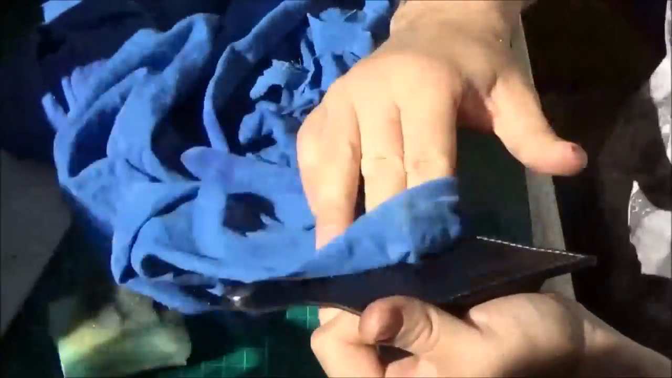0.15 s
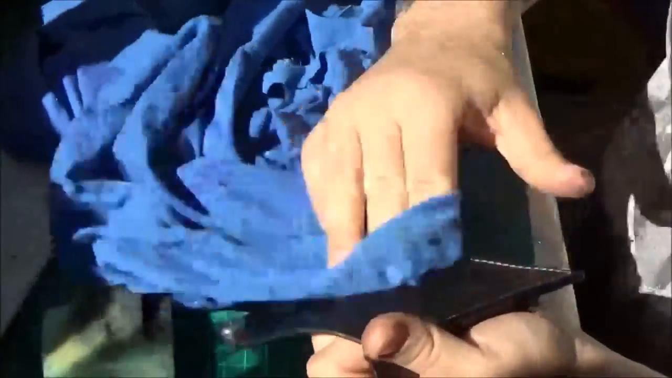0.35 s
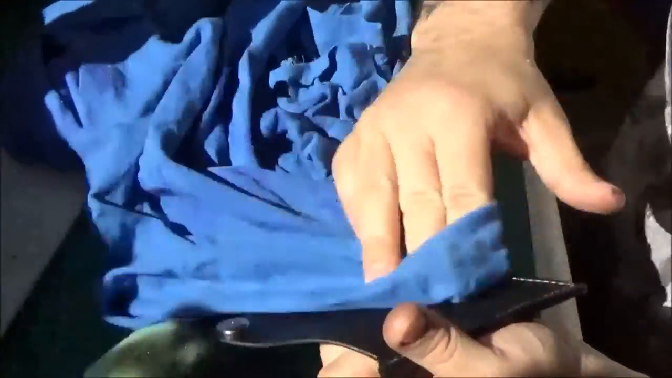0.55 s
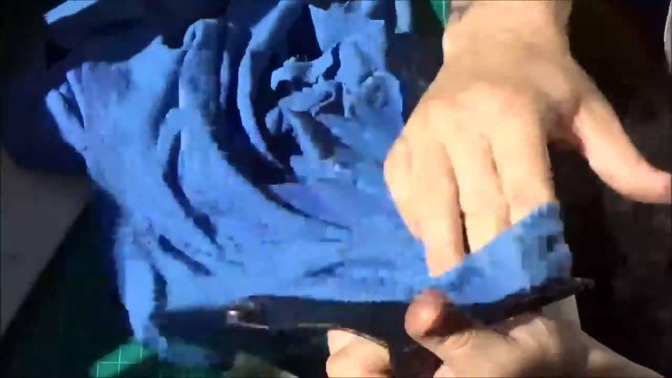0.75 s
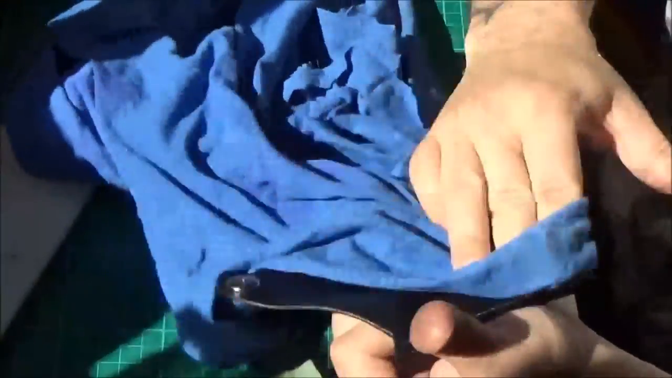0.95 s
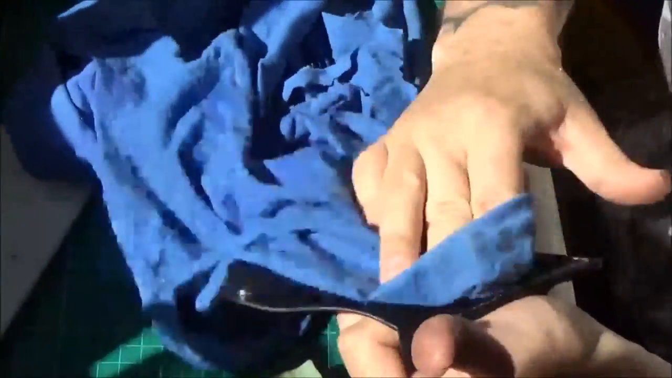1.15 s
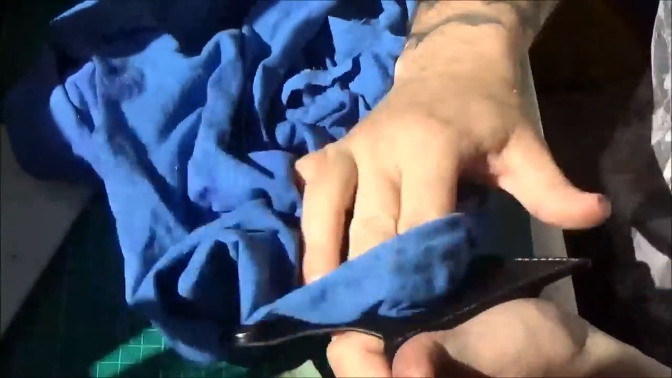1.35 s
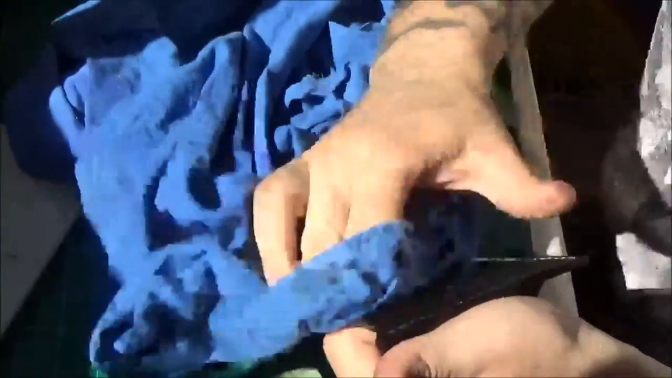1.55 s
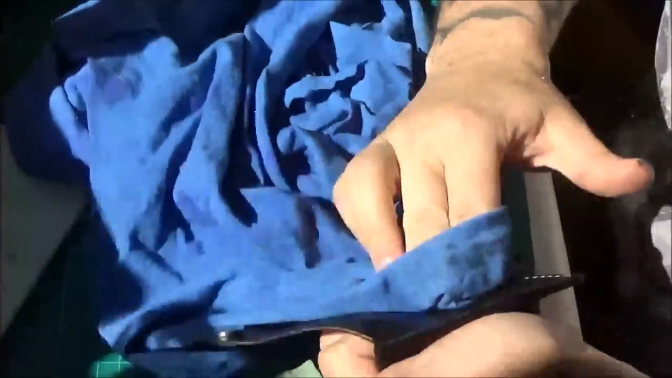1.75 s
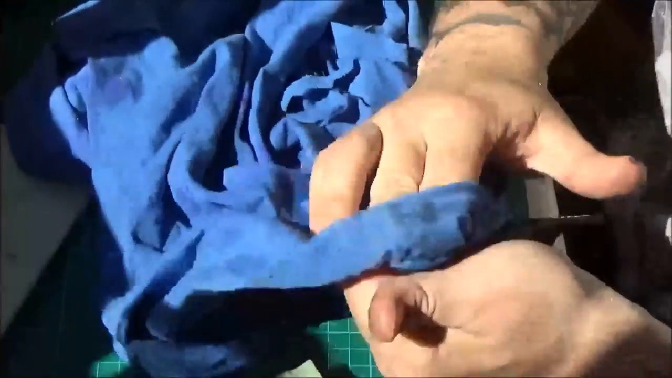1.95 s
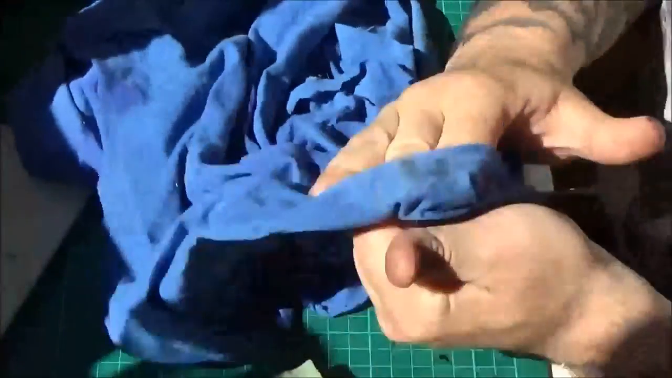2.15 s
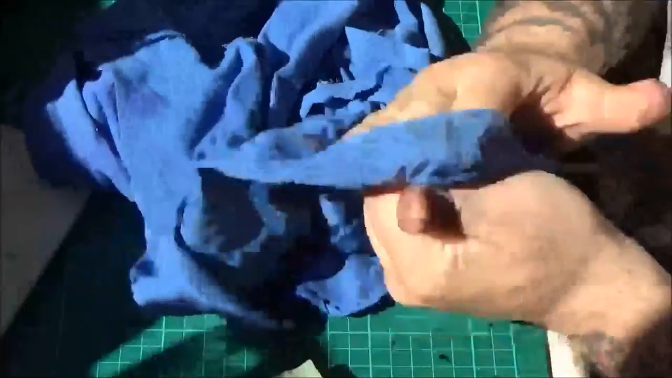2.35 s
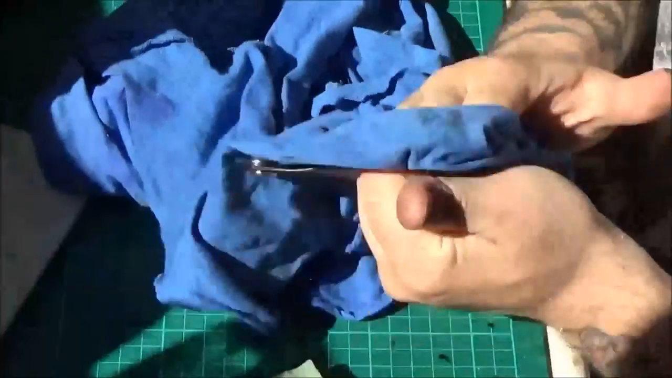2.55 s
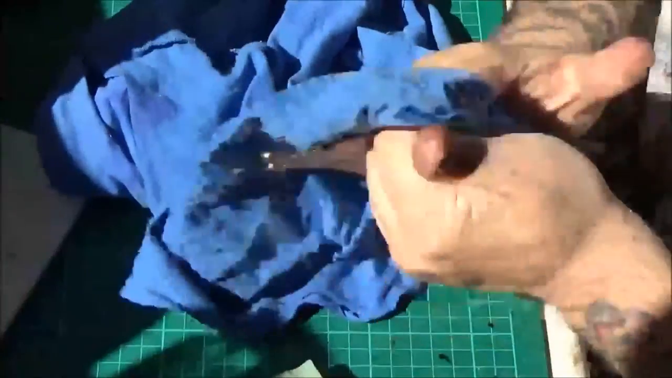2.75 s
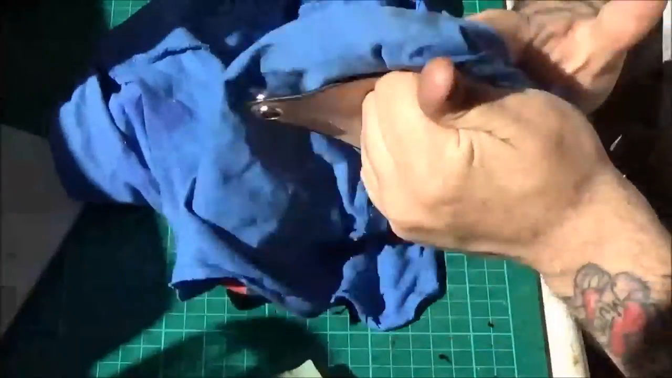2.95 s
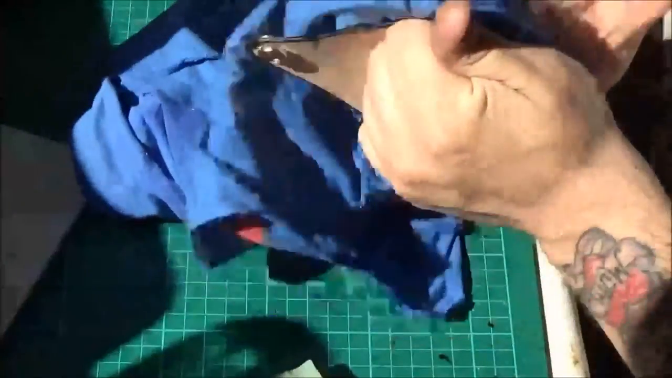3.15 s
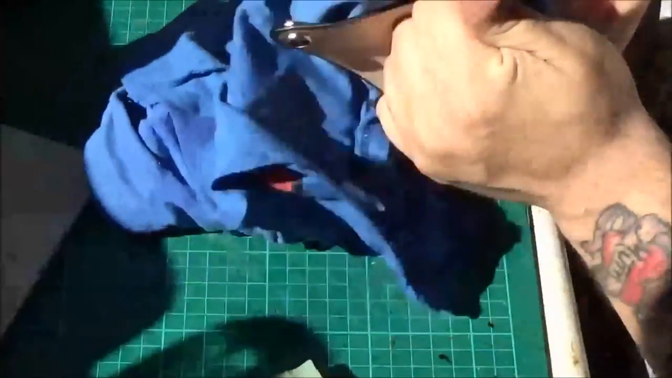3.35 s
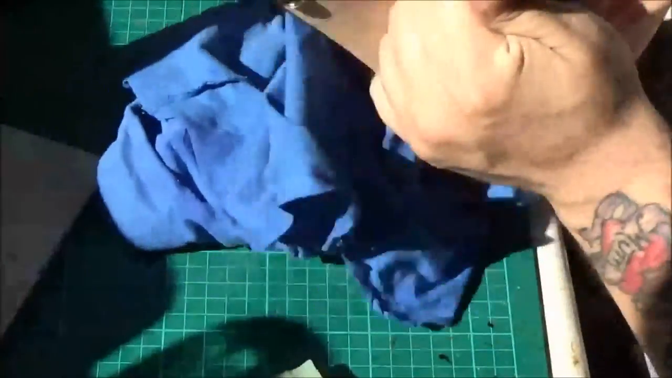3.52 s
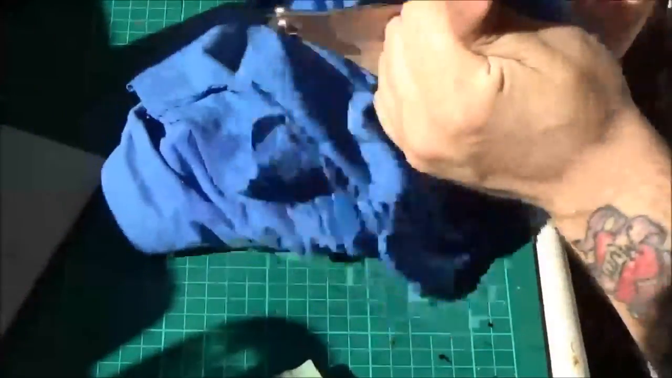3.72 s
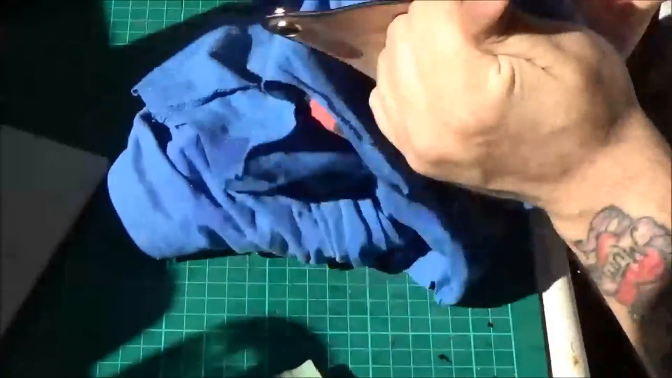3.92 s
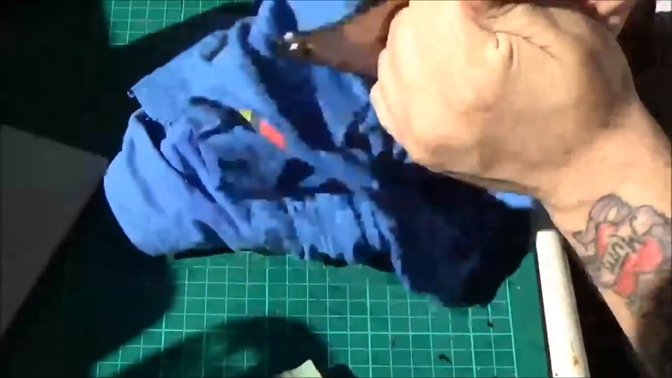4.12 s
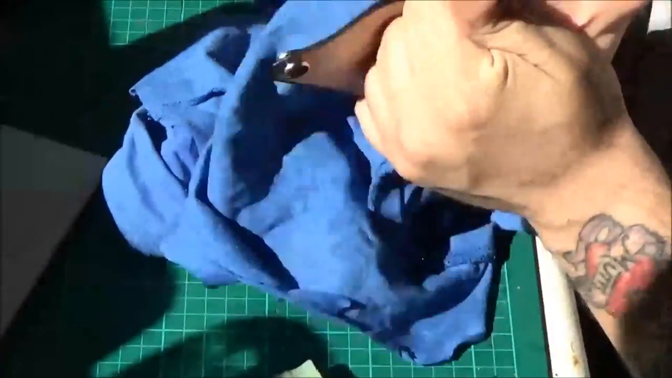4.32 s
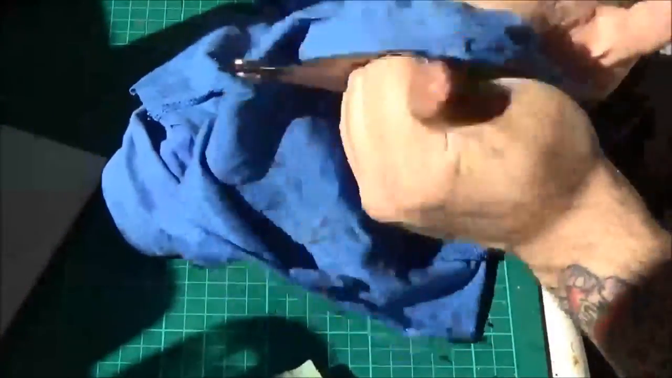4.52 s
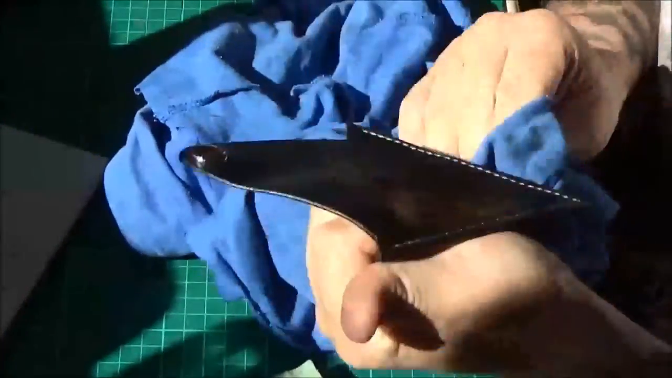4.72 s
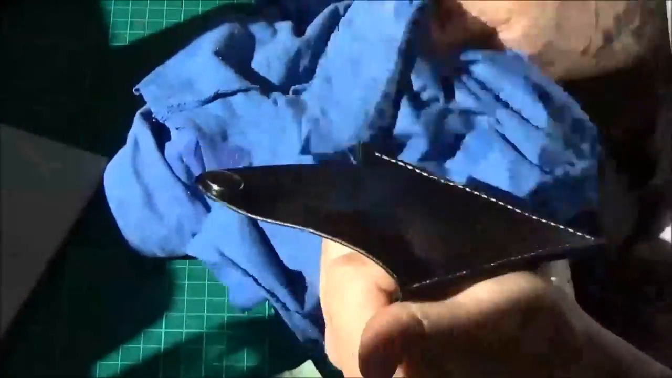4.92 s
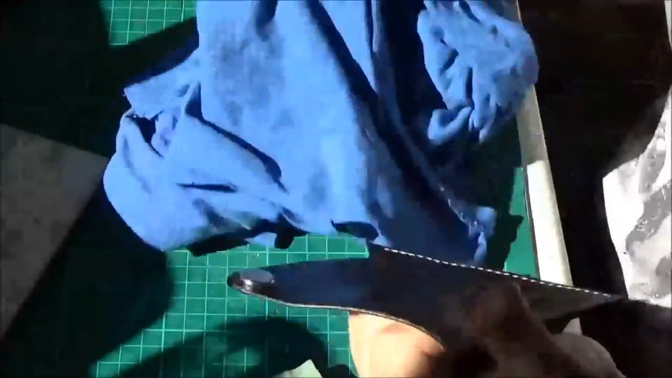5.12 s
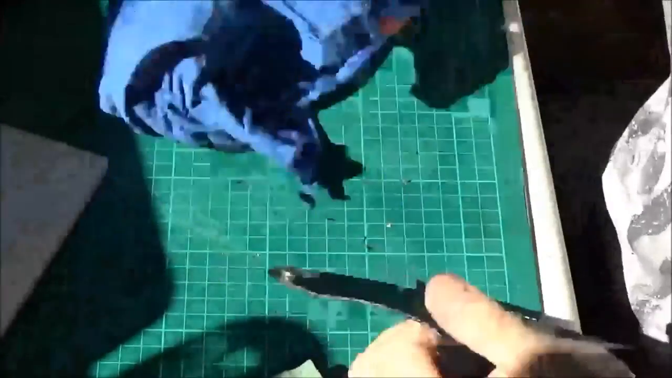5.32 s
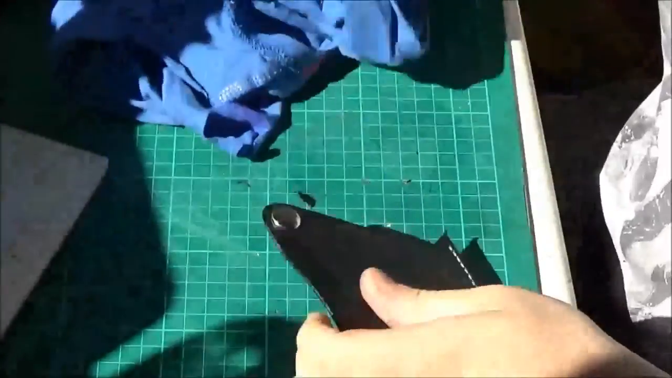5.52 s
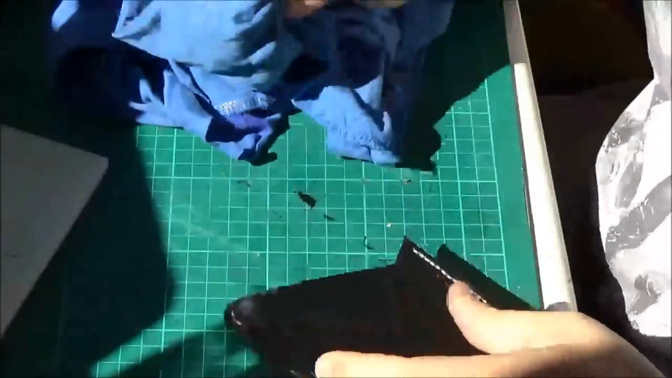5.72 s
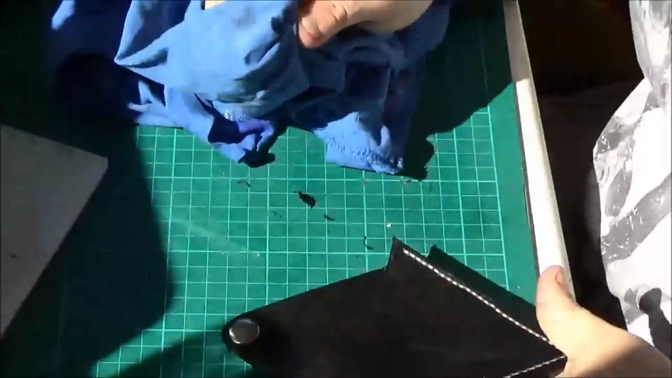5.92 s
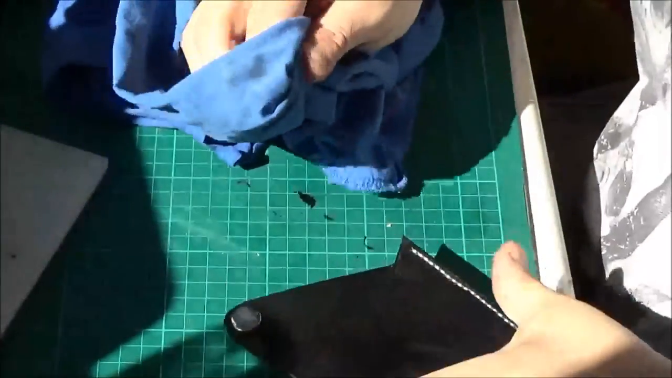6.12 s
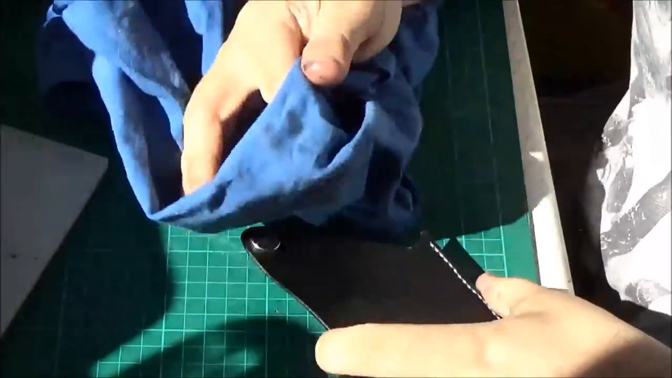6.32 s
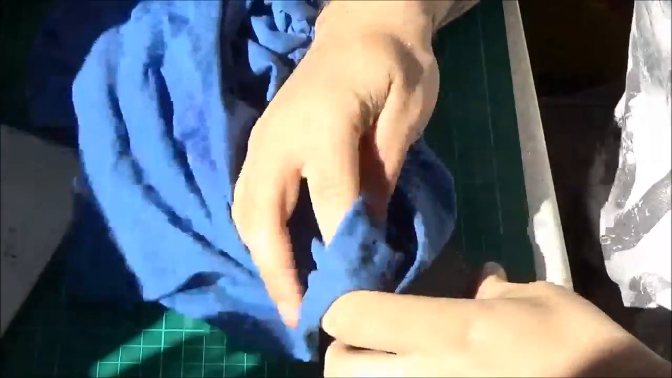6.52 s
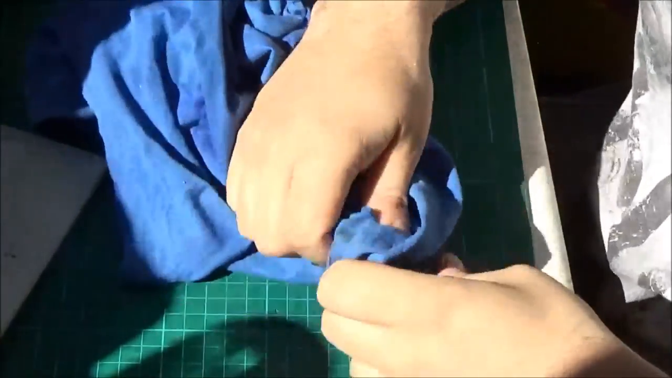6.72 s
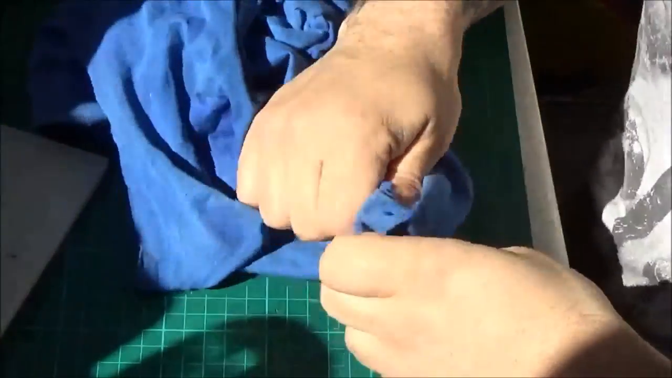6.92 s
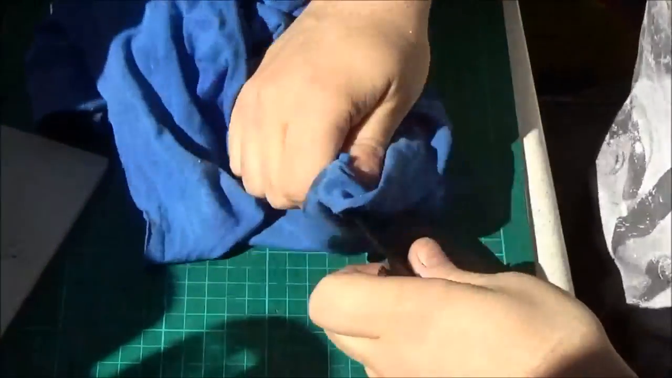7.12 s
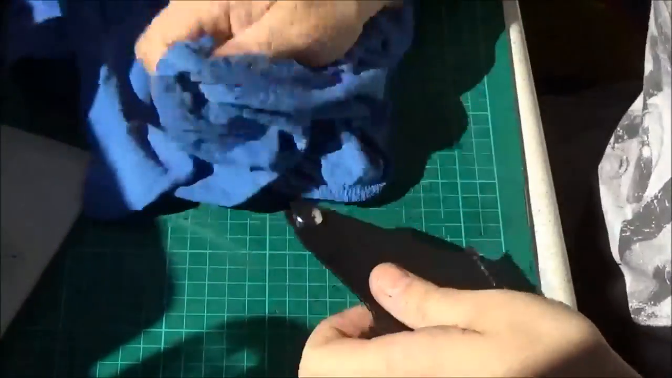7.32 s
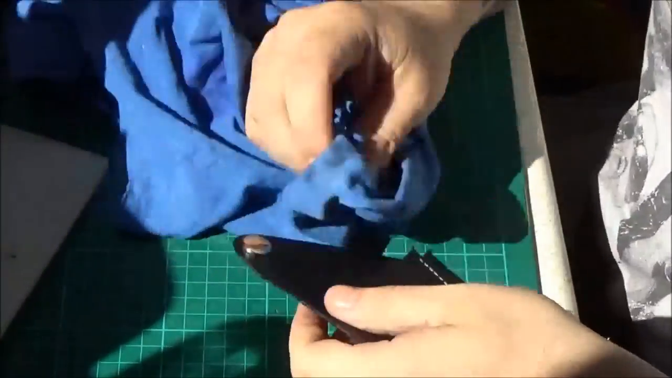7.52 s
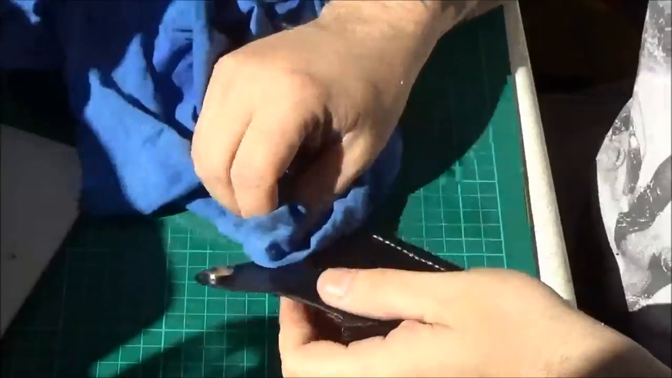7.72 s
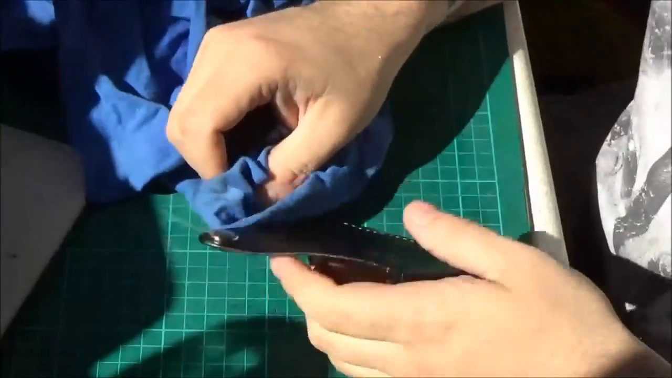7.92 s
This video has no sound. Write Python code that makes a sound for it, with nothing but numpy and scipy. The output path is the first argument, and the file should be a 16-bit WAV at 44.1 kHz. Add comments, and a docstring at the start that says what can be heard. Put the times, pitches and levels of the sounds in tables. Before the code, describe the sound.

A cotton rag hisses briskly back and forth along a leather edge, threads snapping, then rustles off as the piece knocks on a bench.

```python
"""A cotton rag hisses briskly back and forth along the edge of a hand-held leather sheath, about ten
strokes a second: noise of fibre slips follows the hand speed, threads snap in short tone bursts, leather
resonates softly. Then the rag slides off, rustling; the piece is turned over and knocked on the workbench
(minimum-phase clicks ringing at bench modes), and the rag is gathered again. A few faint high chirps, a low
hum and room noise stand behind; the small quiet room adds echoes to the close sounds."""
import sys
import numpy as np
from scipy import signal
from scipy.fft import rfft, irfft
from scipy.io import wavfile
from scipy.ndimage import uniform_filter1d

SR = 44100
rng = np.random.default_rng(int(sys.argv[2]) if len(sys.argv) > 2 else 0)


def pcm_store(signal):
    """Save signal as 16-bit PCM."""
    levels = np.round(np.clip(np.atleast_2d(signal), -1, 1) * 32767)
    wavfile.write(sys.argv[1], SR, levels.astype(np.int16).T)


N = 355446
TIME_S = np.arange(N) / SR
BUFFING_ENDS_S = 4.53

# Rag strokes, pull and push in turn, one brief halt. Each row: start in seconds (lasts until the next),
# relative level of the weave hiss in dB.
STROKES = [(0, -45.5), (.102, -43), (0.189, -45.5), (0.291, -40.5), (.383, -44.5), (0.475, -42.5),
           (0.566, -44), (0.66, -40.5), (.75, -42), (0.834, -40), (.925, -41), (1.012, -38.5), (1.098, -41),
           (1.189, -43), (1.28, -41), (1.36, -38.5), (1.449, -39.5), (1.529, -44.5), (1.615, -46),
           (1.696, -42.5), (1.805, -62), (1.843, -44), (1.985, -42), (2.104, -42.5), (2.21, -39),
           (2.305, -38.5), (2.417, -37), (2.516, -39), (2.621, -35.5), (2.716, -35), (2.818, -33.5),
           (2.905, -36), (3.009, -35.5), (3.099, -36.5), (3.197, -35.5), (3.291, -34), (3.388, -33),
           (3.478, -36.5), (3.573, -36.5), (3.657, -34), (3.755, -35.5), (3.855, -37), (3.952, -35),
           (4.04, -34), (4.141, -34), (4.226, -36), (4.326, -33), (4.421, -39.5)]
# Resonances of leather and cupped hand. Each row: centre in Hz, width in Hz, relative level in dB.
LEATHER_MODES = [(495, 70, -12), (660, 90, -8), (858, 110, -1.5), (1120, 60, -13), (1320, 70, -9),
                 (2040, 70, -9)]
# Hands moving the piece about. Each row: time in seconds, relative level of the leather slide in dB.
HANDLING = [(4.53, -50), (4.73, -43), (4.77, -62.5), (5.03, -60.5), (5.23, -49.5), (5.45, -50),
            (5.7, -52.5), (5.98, -67), (6.2, -57), (6.45, -54), (6.65, -49.5), (7.22, -51.5), (7.29, -56),
            (7.88, -48.5), (8.05, -52)]


def amp(db):
    """Decibels to gain."""
    return 10 ** (np.asarray(db) / 20)


def unit(x):
    """Scales to rms 1."""
    return x / np.sqrt(np.mean(x ** 2) + 1e-20)


def read(points, hz):
    """Interpolates (Hz, value) points on a log-frequency axis."""
    point_hz, value = np.transpose(points)
    return np.interp(np.log(hz + 1), np.log(point_hz + 1), value)


def add(mix, start_s, sound):
    """Mixes a sound in at a time."""
    part = mix[max(round(start_s * SR), 0):][:len(sound)]
    part += sound[:len(part)]


def colour(x, spectrum, peaks=()):
    """Shapes x to a spectrum with resonances standing on it; rms 1."""
    hz = np.fft.rfftfreq(len(x), 1 / SR)
    power = amp(read(spectrum, hz)) ** 2
    for centre_hz, width_hz, db in peaks:
        power = power + amp(db) ** 2 / (1 + (2 * (hz - centre_hz) / width_hz) ** 2) ** 2
    return unit(irfft(rfft(x) * np.sqrt(power), len(x)))


def wander(rate_hz):
    """Smooth random curve, low-passed at a rate; rms 1."""
    noise = rfft(rng.standard_normal(N))
    return unit(irfft(noise * (np.fft.rfftfreq(N, 1 / SR) < rate_hz), N))


def slips(per_s):
    """Tiny fibre slips: impulses of random size at random moments."""
    return rng.standard_normal(N) * (rng.random(N) < per_s / SR)


def air(level_db=-61, side_db=-17):
    """Quiet room noise, slightly wide, with a low hum of phase-wandering sines."""
    # Still room. Each row: frequency in Hz, density in dB per Hz (relative).
    air_spectrum = [(15, -33), (25, -8), (92, 0.5), (202, -8), (288, 3.5), (336, -5.5), (505, -1.5),
                    (651, -11.5), (740, -4), (1550, -7.5), (1850, -6), (2210, -9), (3080, -11),
                    (9930, -18.5), (11000, -21), (14300, -54), (22000, -120)]
    # Hum partials. Each row: frequency in Hz, rms level in dB.
    hum_partials = [(40, -73.5), (86, -76), (300, -82.5)]
    mid, side = (colour(rng.standard_normal(N), air_spectrum) for _ in range(2))
    noise = mid + amp(side_db) * side * np.array([[1], [-1]])
    hum = 0
    for hz, db in hum_partials:
        phase = 2 * np.pi * hz * TIME_S + 0.79 * wander(1.9)
        hum = hum + amp(db) * np.sqrt(2) * np.sin(phase)
    return amp(level_db) * noise + hum


def room(x, near_db=6, near_s=0.0074, side_db=-11):
    """Dense early echoes from bench and hands, then a short tail; both ports hear nearly the same."""
    # Reverberation. Each row: frequency in Hz, T60 in seconds.
    t60_points = [(200, 0.7), (530, 0.24), (1400, 0.25), (3700, 0.22), (9700, 0.25)]
    # Echo colour. Each row: frequency in Hz, relative level in dB.
    wet_points = [(150, -8), (600, 6), (2500, 2.5), (5000, 1.5), (10000, 0)]
    size = SR // 2
    t = np.arange(size) / SR
    taps = rng.choice([-1., 1.], (2, size)) * (rng.random((2, size)) < 4000 / SR) * (t > .001)
    early = 1 + amp(near_db) * np.exp(-t / near_s)
    hz, frame_s, z = signal.stft(taps * early, SR, nperseg=256)
    decay = np.exp(-np.log(1000) * frame_s / read(t60_points, hz)[:, None])
    tails = signal.istft(z * decay, SR, nperseg=256)[1][:, :size]
    wet_gain = amp(read(wet_points, np.fft.rfftfreq(size, 1 / SR)))
    tails = irfft(rfft(tails / np.linalg.norm(tails[0])) * wet_gain)
    mid, side = signal.fftconvolve(x[None], tails, axes=1)[:, :N]
    return mid + amp(side_db) * side * np.array([[1], [-1]])


def chirps(waver_hz=35, long_waver_hz=22, scatter_hz=110, arch_hz=120, level_db=0.5):
    """Thin wavering whistles, perhaps a bird outside: short ones fall, alternating high and low; long ones arch."""
    # Held whistles. Each row: start in seconds, length in seconds, nominal top pitch in Hz, relative level in dB.
    whistles = [(5.118, .052, 4290, -62), (5.498, .13, 6150, -61), (5.625, .09, 6300, -60),
                (5.73, .12, 6100, -62)]
    trill_s, every_s, note_s = 4.765, .0398, .021
    trill_hz, step_hz, trill_fall_hz, trill_db = 2850, 280, 480, -64
    trill = []
    for k, off in enumerate(rng.uniform(-1.16, 1, size=9)):
        note_hz = trill_hz - k % 2 * step_hz + scatter_hz * off
        trill.append((trill_s + k * every_s, note_s, note_hz, trill_db))
    out = np.zeros(N)
    for notes, fall_hz, unsteady_hz in (trill, trill_fall_hz, waver_hz), (whistles, 0, long_waver_hz):
        for start_s, length_s, base_hz, db in notes:
            share = np.linspace(0, 1, int(length_s * SR))
            hz = base_hz - fall_hz * share + arch_hz * (np.sin(np.pi * share) - 1)
            hz = hz + unsteady_hz * unit(uniform_filter1d(rng.standard_normal(len(hz)), size=120))
            tone = np.sin(2 * np.pi * np.cumsum(hz) / SR)
            add(out, start_s, amp(db + level_db) * signal.windows.tukey(len(hz), .7) * tone)
    return out * (.9 + .45 * wander(220))  # blurred by distance


def mode(hz, centre_hz, db, t60_s):
    """Frequency response of one decaying mode."""
    return amp(db) / (1 + 2j * np.pi * (hz - centre_hz) * t60_s / np.log(1000))


def blow(db, thud_db, edge_hz, spot_hz, spot_db, ring_cycles=14, lag_s=0.001074, size=8192):
    """One contact: a minimum-phase click, lifted at the bench modes and at the ring of the spot struck."""
    # Leather on the bench top. Each row: mode in Hz, peak against the plain click in dB, T60 in seconds.
    bench_modes = [(192, -1, .08), (390, -2, .07), (562, 2, .07), (1325, 2, .045), (2520, -3, .03),
                   (3020, -4, .02), (4300, -1, .031), (6250, -4, .007)]
    thud_hz, treble_db_per_octave = 750, -19  # thud lies below thud_hz; treble slope starts at edge_hz
    hz = np.fft.rfftfreq(size, 1 / SR)
    octaves_above = np.log2(1 + (hz / edge_hz) ** 4) / 4
    contact_db = db + thud_db / (1 + (hz / thud_hz) ** 2) + treble_db_per_octave * octaves_above
    log_gain = np.log(amp(contact_db) * (hz + 1) / (hz + 60))
    circle = np.concatenate([log_gain, log_gain[-2:0:-1]])
    click = np.exp(np.conj(signal.hilbert(circle)))[:len(hz)]
    bench = 1 + sum(mode(hz, *row) for row in bench_modes)
    spot = 1 + mode(hz, spot_hz, spot_db, ring_cycles / spot_hz)
    # bending waves: bass trails treble, by lag_s at 1 kHz
    bending = np.exp(-4j * np.pi * lag_s * np.sqrt(10 ** 3 * hz))
    return irfft(click * bench * spot * bending, size)


def fingering(per_s=14, level_db=30, spread_db=4):
    """Small random taps of fingers and stud, as strong as the hands are busy."""
    busy = amp(np.interp(TIME_S, *np.transpose(HANDLING)) + level_db) * (TIME_S > BUFFING_ENDS_S)
    taps = amp(spread_db * rng.uniform(-1.3, 1, N)) * (rng.random(N) < per_s / SR)
    tap = blow(-8.5, thud_db=-6.5, edge_hz=2900, spot_hz=1440, spot_db=4)
    return signal.oaconvolve(busy * taps, tap)[:N]


def knocks(level_db=-4.0):
    """Leather and stud meet the bench top, and tick lightly as they are turned."""
    # Bench contacts, brighter when harder. Each row: start in seconds, relative strength in dB, thud of the
    # weight behind in dB, bright edge in Hz, ring of the struck spot in Hz, ring level in dB.
    contacts = [(5.399, -1.5, 4, 3200, 130, 6), (5.543, -14.5, -8, 3000, 1620, 17.5),
                (5.698, -2, -15.5, 7000, 1520, 18), (5.8034, 9, -16.5, 2220, 2280, 2.5),
                (5.9036, -18.5, -3, 1600, 1450, 16), (6.1011, -12, -7.5, 2000, 1520, 13),
                (6.678, -16, -7, 2500, 1550, 12), (7.338, -20, -14, 2500, 1560, 11),
                (7.4651, -13, 4.5, 2800, 537, -7), (7.911, 6, 0, 3700, 560, 0)]
    # Dry ticks of the piece turning in the fingers. Each row: start in seconds, relative strength in dB.
    ticks = [(5.035, -24), (5.19, -20), (5.217, -18.5), (5.37, -20.5), (5.41, -14.5), (5.445, -18),
             (5.5324, -24), (7.6412, -16)]
    out = np.zeros(N)
    for start_s, *contact in contacts:
        add(out, start_s, blow(*contact))
    for start_s, db in ticks:
        add(out, start_s, blow(db, thud_db=-4, edge_hz=SR / 2, spot_hz=1150, spot_db=-4))
    return amp(level_db) * out


def scuffs():
    """Short noises, each swelling and fading around one centre, from narrow leather creaks to broad brushes."""
    # Each row: middle in seconds, length (half the window) in seconds, level before the window in dB,
    # centre in Hz, width in octaves.
    touches = [(.03, 0.064, -57, 140, 0.33), (0.077, 0.021, -48.5, 1430, 0.37),
               (0.244, 0.077, -48, 1280, 0.64), (.375, .071, -47.5, 210, 3.4),
               (1.028, 0.026, -48.5, 837, 0.19), (1.31, 0.035, -48, 870, .1),
               (1.443, 0.03, -46.5, 875, 0.15), (1.498, 0.036, -47.5, 866, 0.15),
               (1.931, 0.096, -49.5, 930, 0.41), (4.554, 0.06, -55, 142, 0.32),
               (4.581, .1, -51.5, 1880, 0.31), (5.228, .07, -54, 1040, 0.52),
               (4.717, 0.036, -50.5, 910, 0.41), (5.427, 0.069, -47.5, 895, 1.2),
               (6.53, .05, -59.5, 480, 0.69), (6.75, 0.19, -61, 1620, .25),
               (6.844, 0.072, -59.5, 4100, .25), (7.062, 0.19, -51.5, 2960, 2.1),
               (7.217, 0.049, -53.5, 890, 0.42)]
    out = np.zeros(N)
    for middle_s, length_s, db, centre_hz, width_octaves in touches:
        size = int(2 * length_s * SR)
        away = np.log2((np.fft.rfftfreq(size, 1 / SR) + 1) / centre_hz) / width_octaves
        band = unit(irfft(rfft(rng.standard_normal(size)) * np.exp(-away ** 2), size))
        add(out, middle_s - length_s, amp(db) * band * np.hanning(size) ** 2)
    return out


def swell(length_s, rise_share=.28):
    """One pull of the rag: swells quickly, dies away more slowly."""
    share = np.linspace(0, 1, int(length_s * SR))
    return np.sin(np.pi * np.interp(share, [0, rise_share, 1], [0, .5, 1]))


def handling(rustle_db=-2.0, slide_db=-7.5, crumple_db=1.2, fumble_db=-0.6, rag_below_slide_db=-9.5):
    """The slack rag rustles with every move while leather slides over skin and mat: two coloured slip noises."""
    # Rag pulled off, dragged, gathered. Each row: start in seconds, length in seconds, relative level in dB.
    rustles = [(4.522, 0.19, -35.5), (4.669, 0.086, -47.5), (5.191, 0.085, -79), (5.383, .1, -53),
               (5.512, .05, -50.5), (6.692, 0.14, -53.5), (6.95, .18, -43), (7.152, 0.12, -52)]
    # Rag noise. Each row: frequency in Hz, density in dB per Hz (relative).
    rustle_spectrum = [(900, -6), (2000, -3), (3500, 0), (5000, 2), (6800, 4), (8500, 2.5), (11000, 0.5)]
    # Leather slide noise. Each row: frequency in Hz, density in dB per Hz (relative).
    slide_spectrum = [(150, -19), (300, -9.5), (520, -10), (650, -11), (860, -6.5), (1050, -5), (1350, -4),
                      (1900, -8), (3500, -10.5), (8000, -11)]
    moving = amp(np.interp(TIME_S, *np.transpose(HANDLING)))
    rag = amp(rag_below_slide_db) * moving
    for start_s, length_s, db in rustles:
        add(rag, start_s, amp(db) * swell(length_s))
    rag_peaks = [(6500, 1300, -13), (2270, 380, -15)]  # Hz, width Hz, dB
    rustle = amp(rustle_db) * rag * colour(slips(22000), rustle_spectrum, rag_peaks)
    fumble = amp(slide_db + fumble_db * wander(29))
    slide = fumble * moving * colour(slips(6000), slide_spectrum, LEATHER_MODES)
    gate = uniform_filter1d(1. * (TIME_S > BUFFING_ENDS_S), size=700)
    return (rustle + slide) * amp(crumple_db * wander(70)) * gate


def thread(hz, length_s, fray=0.18):
    """A thread letting go: an abrupt short burst of uneven pitch, with a little broad crackle."""
    envelope = signal.windows.tukey(int(length_s * SR), .5)
    sway, crackle = rng.standard_normal((2, len(envelope)))
    phase = 2 * np.pi * np.cumsum(hz * (1 + 0.38 * uniform_filter1d(sway, size=7))) / SR
    return envelope * (np.sin(phase) + fray * crackle)


def snaps(length_s=.0015, pitch_hz=9900, spread_share=0.031):
    """Threads snapping: strong ones on the strokes, fainter ones in the pauses, two in the rag later."""
    # Each row: start in seconds, tone peak in dB.
    thread_snaps = [(.541, -22), (.7243, -20.5), (.8984, -21.5), (1.0263, -32), (1.068, -18.5),
                    (1.093, -19), (1.1873, -26.5), (1.399, -23.5), (1.4377, -20.5), (1.501, -29),
                    (1.5307, -28), (2.591, -26), (3.1433, -24), (3.3428, -20.5), (3.38, -22), (3.412, -19),
                    (3.7531, -18.5), (3.9539, -18), (4.0864, -19), (4.18, -19), (4.2877, -19.5),
                    (4.4073, -23), (4.434, -22), (5.19, -40.5), (5.411, -29)]
    out = np.zeros(N)
    for start_s, db in thread_snaps:
        hz = pitch_hz * (1 + spread_share * rng.uniform(-1.1, 1))
        add(out, start_s, amp(db) * thread(hz, length_s))
    return out


def folds(x, patchy_db):
    """Shifting cloth folds shade patches of the spectrum for a few hundredths of a second; rms 1."""
    z = signal.stft(x, nperseg=256)[2]
    patches = uniform_filter1d(rng.standard_normal(z.shape), size=5, axis=0)
    patches = unit(uniform_filter1d(patches, size=9, axis=1))
    return unit(signal.istft(z * amp(patchy_db * patches), nperseg=256)[1][:N])


def hand_speed(top_share=0.51, jerked_top_share=0.29, jerked_until_s=1.8):
    """Speed 0-1: the hand stops at each turn; early pulls are jerked (top speed sooner), the rest smooth."""
    turn_s = np.append(np.transpose(STROKES)[0], BUFFING_ENDS_S)
    jerked = (np.arange(len(STROKES)) % 2 == 0) & (turn_s[:-1] < jerked_until_s)
    fastest_s = turn_s[:-1] + np.diff(turn_s) * np.where(jerked, jerked_top_share, top_share)
    marks_s = np.sort(np.append(turn_s, fastest_s))
    return abs(np.sin(np.pi * np.interp(TIME_S, marks_s, np.arange(len(marks_s)) / 2)))


def buffing(grip_db=1.17, small_per_s=40, small_db=-2.0, catch_db=9, sing_db=-9, sing_hz=6550, creak_db=2.5):
    """Slip noise driven by hand speed: hiss follows it more steeply than rasp; leather resonates beneath."""
    # Weave hiss. Each row: frequency in Hz, density in dB per Hz (relative).
    hiss_spectrum = [(2500, -27), (4000, -7), (5200, -2.5), (6500, 2.5), (8200, 0), (10000, 1.5),
                     (11200, -5.5)]
    # Coarser rasp. Each row: frequency in Hz, density in dB per Hz (relative).
    rasp_spectrum = [(500, -12), (1000, -8), (1400, -0.5), (2400, 1), (3600, 3.5), (5000, 3), (9000, -6)]
    # Cloth pad drag. Each row: frequency in Hz, density in dB per Hz (relative).
    drag_spectrum = [(60, -9), (140, -6.5), (210, -18.5), (300, -7), (400, -9.5), (500, -4), (620, -22),
                     (1100, -4), (2500, -30.5)]
    # Skirt under the leather resonances. Each row: frequency in Hz, density in dB per Hz (relative).
    hollow_spectrum = [(300, -23), (800, -15), (3000, -29)]
    # Grip; the hollow under the hand closes as it is lifted. Each row: time in seconds, extra rasp in dB,
    # relative ring of the hollow in dB.
    hold = [(0, 0.4, -59.5), (0.801, 2.5, -53.5), (1.15, 0.8, -55), (1.45, -.8, -58.5), (1.62, -0.5, -59.5),
            (2.15, -1, -58), (2.65, 0, -55.5), (3.1, -1, -61.5), (3.65, 1, -63.5), (4.5, -1.3, -64)]
    rasp_base_db, rasp_db_per_hiss_db, usual_hiss_db = -46.5, 0.58, -37.5

    def level(db):
        return uniform_filter1d(amp(db) * (TIME_S < BUFFING_ENDS_S), size=700)

    turn_s, stroke_db = np.transpose(STROKES)
    hold_s, extra_db, hollow_db = np.transpose(hold)
    speed = hand_speed()
    hiss_db = stroke_db[np.clip(np.searchsorted(turn_s, TIME_S, "right") - 1, 0, None)]
    rasp_db = rasp_base_db + rasp_db_per_hiss_db * (hiss_db - usual_hiss_db)
    rasp = level(rasp_db + np.interp(TIME_S, hold_s, extra_db))
    body = level(np.interp(TIME_S, hold_s, hollow_db) + creak_db * wander(12))
    hiss = level(hiss_db) * (0.039 + 0.96 * speed ** 1.31)
    grip = amp(grip_db * wander(170) + 2.5)  # the weave grips and yields unevenly
    out = hiss * grip * folds(colour(slips(20000), hiss_spectrum), patchy_db=2.0)
    rasp_noise = folds(colour(slips(10000), rasp_spectrum), patchy_db=2.0)
    out += rasp * grip * (0.079 + 0.93 * speed ** 0.62) * rasp_noise
    # near top speed the polished edge half sings, now more, now less
    sing = np.sqrt(2) * wander(600) * np.cos(2 * np.pi * sing_hz * TIME_S)
    out += amp(sing_db + 2.9 * wander(29)) * hiss * speed ** 3 * sing
    out += amp(-13) * rasp * (0.76 + 0.49 * speed) * colour(slips(3000), drag_spectrum)
    out += body * (.1 + speed) * colour(slips(3000), hollow_spectrum, LEATHER_MODES)
    # small catches ride on the strokes
    for place, strength, pitch in rng.random((int(small_per_s * BUFFING_ENDS_S), 3)):
        start_s = place * BUFFING_ENDS_S
        gain = hiss[int(start_s * SR)] * amp(small_db + catch_db * strength ** 7)
        add(out, start_s, gain * thread(6500 + 4500 * np.sqrt(pitch), 0.00104))
    return out


def scene():
    """Close cloth, knocks on the bench below, chirps far off, all in one small room."""
    far = chirps()
    bench = knocks() + fingering()
    cloth = buffing() + snaps() + handling() + scuffs()
    direct = cloth + bench + amp(1) * far
    echoes = amp(-8.5) * room(cloth, side_db=-7.0) + amp(-2) * room(bench + far, side_db=-13.5)
    return direct + echoes + air()


def record(dry, edge_hz=11150):
    """Left port a touch louder; steep low-pass band limit."""
    lowpass = signal.firwin(401, edge_hz, window=("kaiser", 7), fs=SR)
    return signal.oaconvolve(dry * amp([[.1], [-.1]]), lowpass[None], "same", axes=1)


dry = scene()
out = record(dry)
pcm_store(out)
```